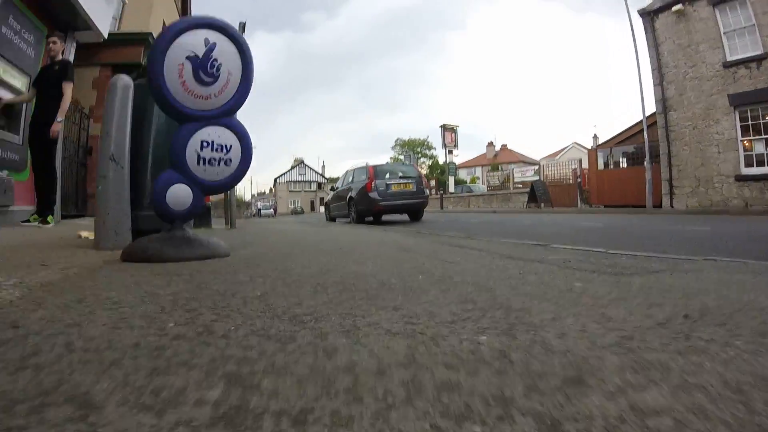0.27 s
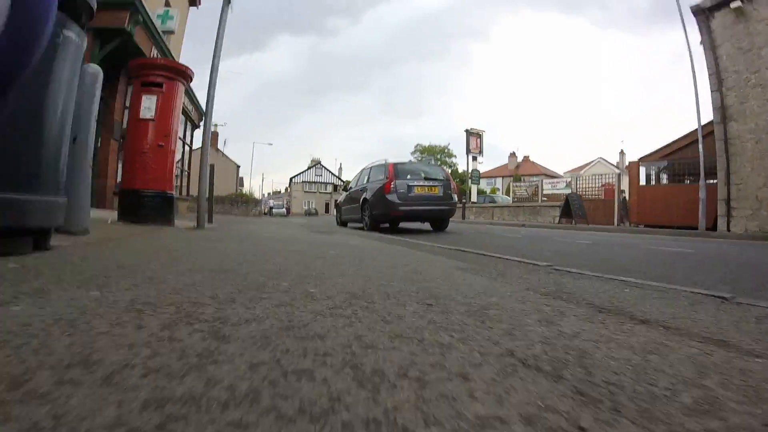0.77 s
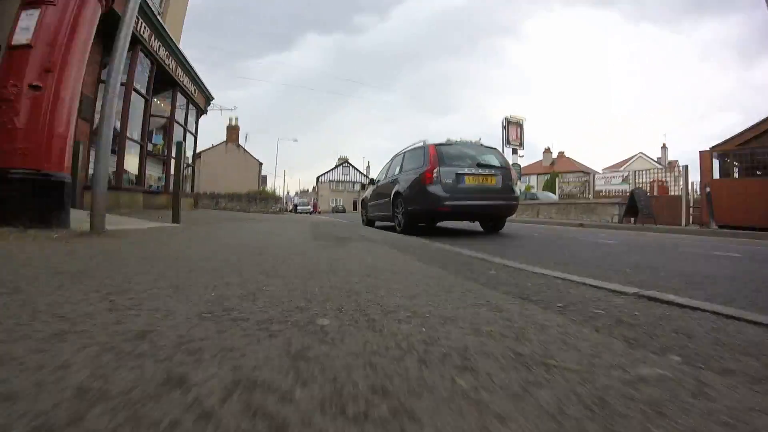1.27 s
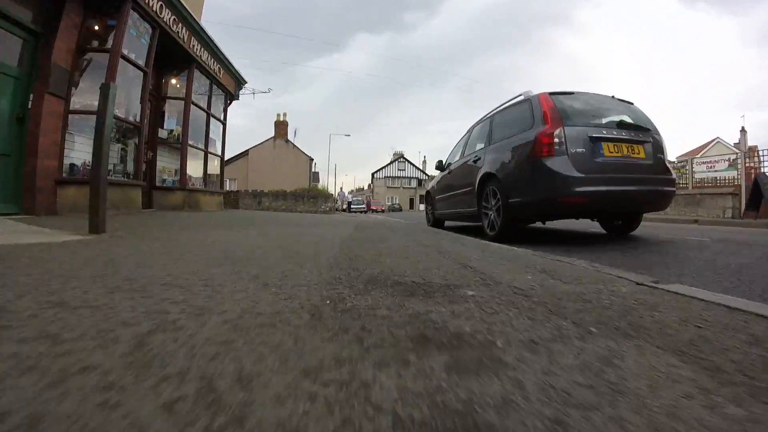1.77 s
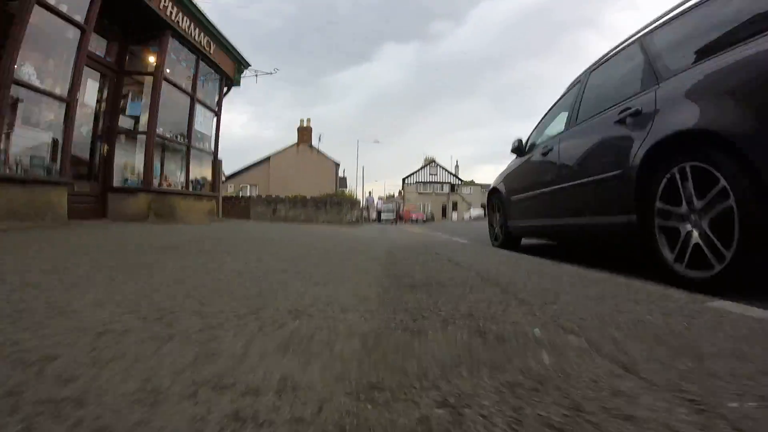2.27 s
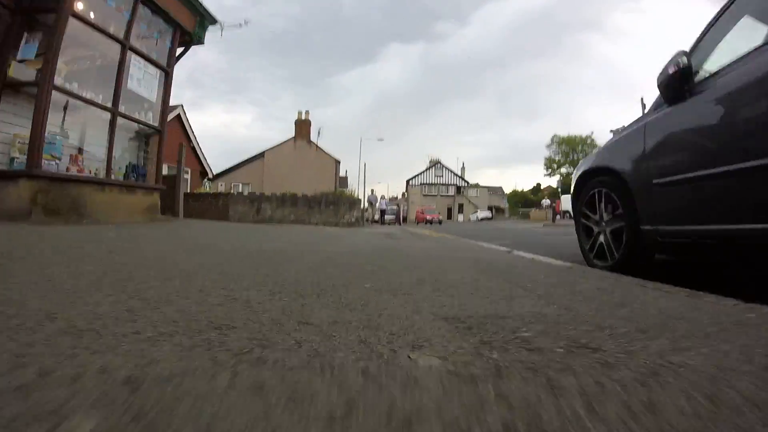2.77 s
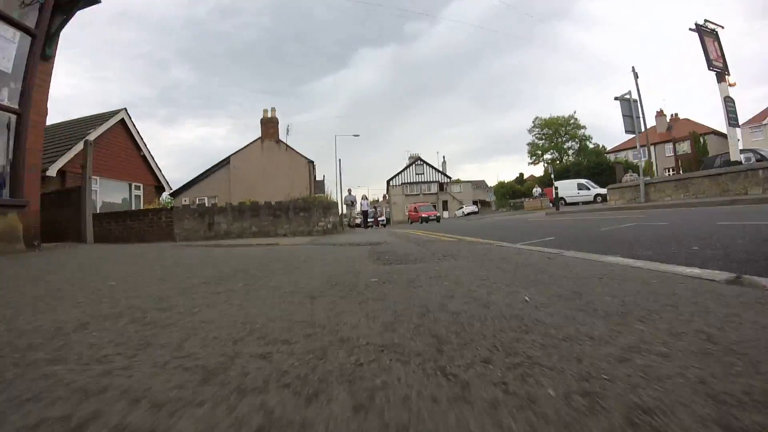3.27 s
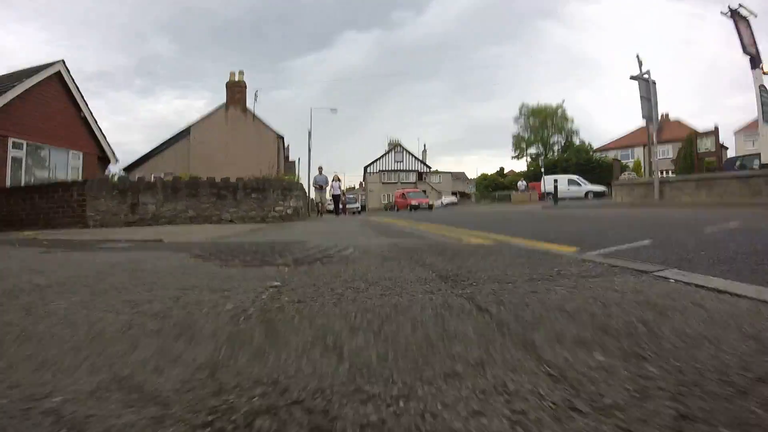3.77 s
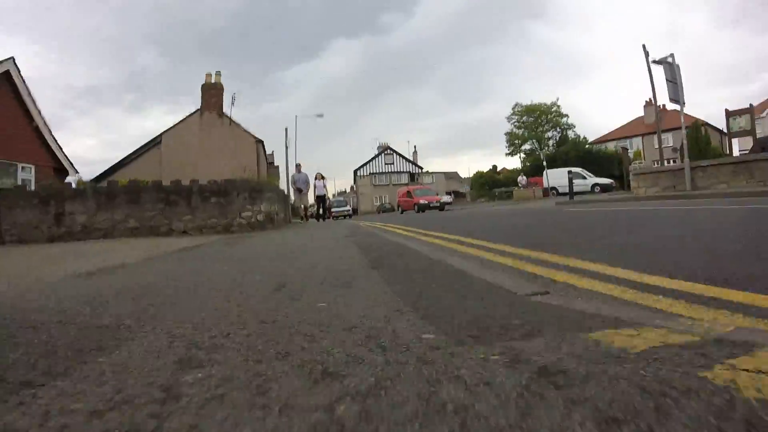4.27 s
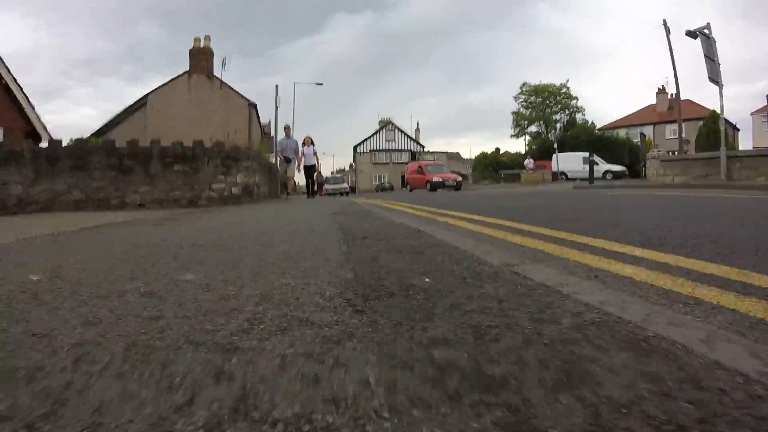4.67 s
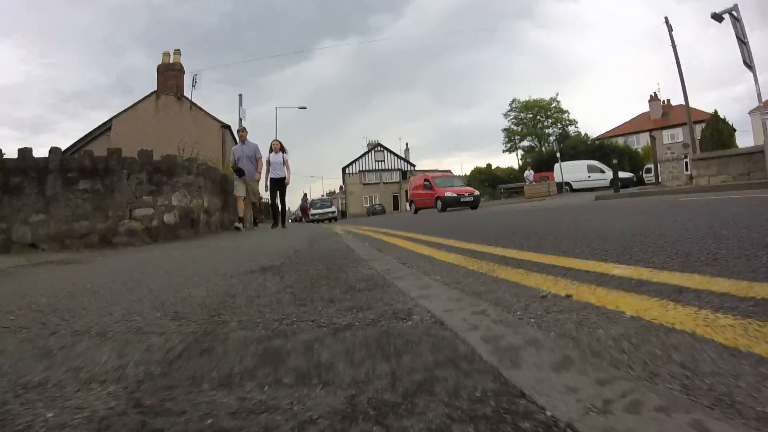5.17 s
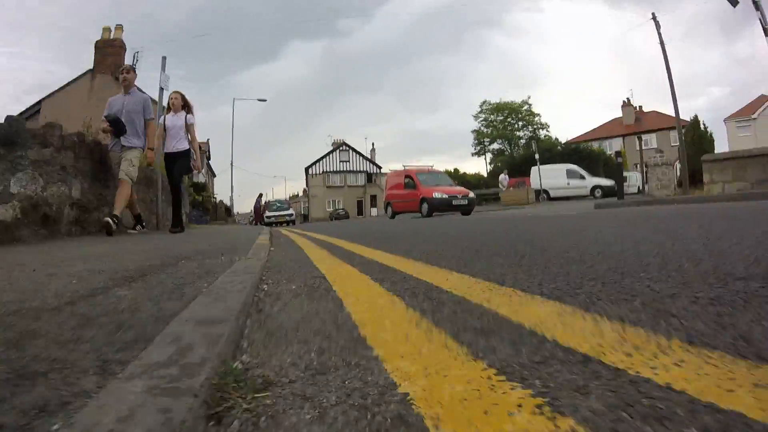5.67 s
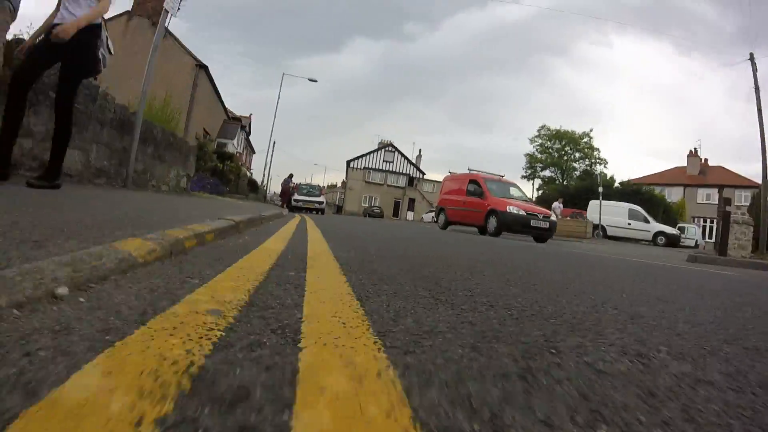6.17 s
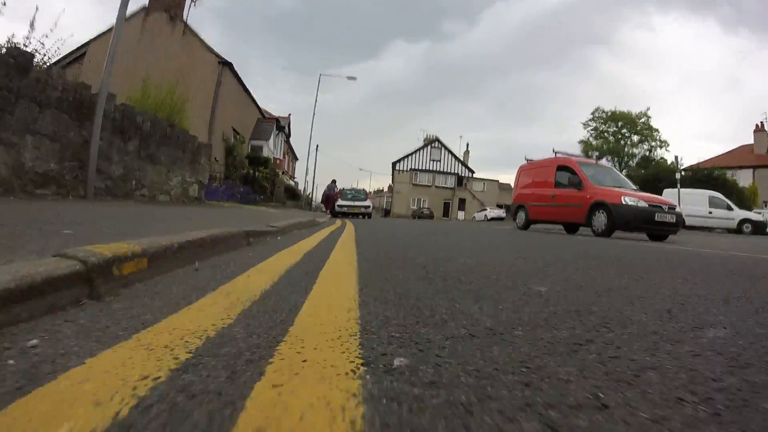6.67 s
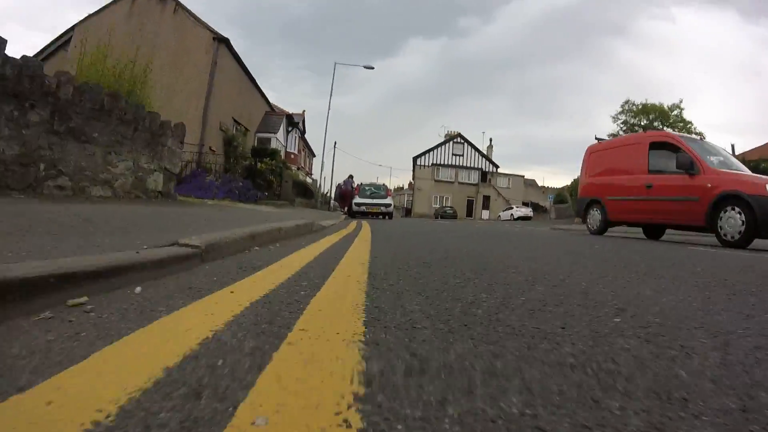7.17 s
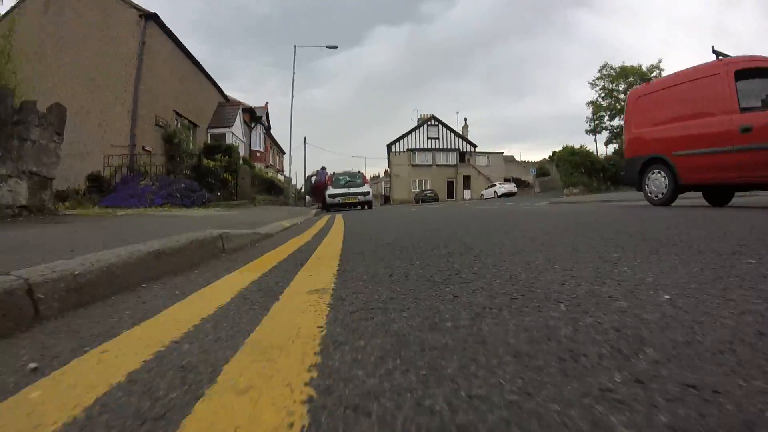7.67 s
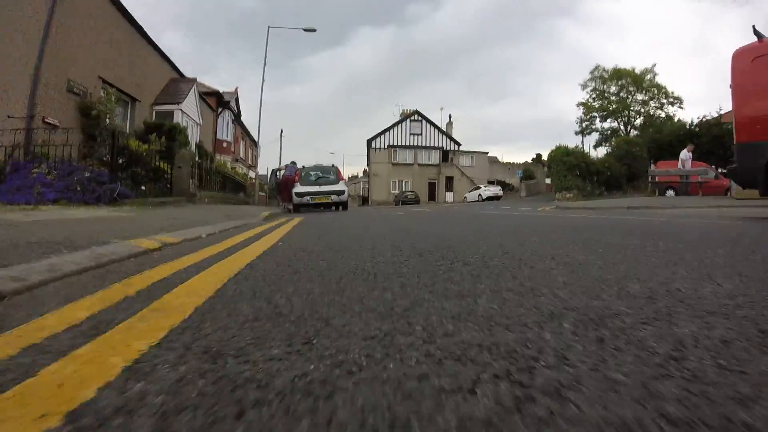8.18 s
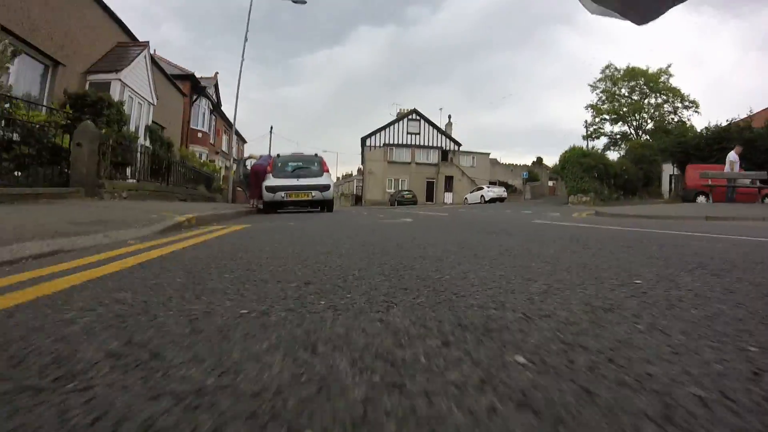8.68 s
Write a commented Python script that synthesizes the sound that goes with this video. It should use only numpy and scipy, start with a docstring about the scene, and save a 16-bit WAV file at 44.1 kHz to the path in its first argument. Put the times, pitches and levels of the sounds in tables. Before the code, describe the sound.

Continuous low booming roll of skateboard wheels on coarse road, heard through the deck, with rattles, gritty hiss, sharp clacks and tiny chirps.

```python
"""A booming, growling roll with loose chatter and hard knocks: a longboard on rough asphalt,
heard by a camera fixed to the deck. Road bumps make the deck boom on its bending mode, grit makes the wheels
growl, and the camera mount chatters as the deck swings. Cracks and kerb edges knock through, slips chirp,
scrubbing wheels swish and fine grit hisses. A soft limiter holds the peaks down."""
import sys
import numpy as np
from scipy import signal
from scipy.fft import rfft, irfft, next_fast_len
from scipy.io import wavfile
from scipy.ndimage import uniform_filter1d

SR = 44100
rng = np.random.default_rng(int(sys.argv[2]) if len(sys.argv) > 2 else 0)


def pcm_store(signal):
    """Save signal as 16-bit PCM."""
    levels = np.round(np.clip(np.atleast_2d(signal), -1, 1) * 32767)
    wavfile.write(sys.argv[1], SR, levels.astype(np.int16).T)


N = 393372  # samples

# modes of wheels and trucks: (frequency [Hz], width [Hz], level [dB])
WHEEL_MODES = [(198.8, 81.4, 3.5), (321.5, 71, -1), (405, 92.6, -1.5), (573, 151, -18.5)]
# modes of the camera mount: (frequency [Hz], width [Hz], level [dB])
MOUNT_MODES = [(840, 730, 0.5), (1270, 95, 3.5), (1447, 390, 1), (1898, 236, 5.5), (2500, 388, 2),
               (3400, 1000, -18.5)]
# modes of the mount's casing: (frequency [Hz], width [Hz], level [dB])
CASING_MODES = [(3940, 470, -0.5), (5784, 1260, -1.5), (7560, 700, -9), (8300, 1170, -8),
                (9940, 3100, -19.5), (13000, 2600, -31.5)]
USUAL_GROWL_DB, USUAL_CHATTER_DB = -32, -48  # reference levels for layers that follow the road


def amp(db):
    """Decibels to amplitude."""
    return 10 ** (np.asarray(db) / 20)


def evened(x):
    """Scales a signal to rms 1."""
    return x / np.sqrt(np.mean(x ** 2) + 1e-20)


def peak_one(x):
    """Scales a signal to peak 1."""
    return x / abs(x).max()


def curves(rows):
    """Draws each column of a timed table as a curve, one value a sample."""
    times, *columns = np.transpose(rows)
    return [np.interp(np.arange(N) / SR, times, column) for column in columns]


def wander(smooth_s):
    """Slow random drift of rms 1: noise averaged twice."""
    size = max(round(smooth_s * SR), 1)
    smoothed = uniform_filter1d(rng.standard_normal(N), size)
    return evened(uniform_filter1d(smoothed, size))


def grit(per_s, spread_db):
    """Random stone contacts at a mean rate, a few of them large."""
    boost_db = spread_db * np.minimum(rng.exponential(1, N), 5)
    size = amp(boost_db) * rng.standard_normal(N)
    return size * (rng.random(N) < per_s / SR)


def resonate(x, hz, width):
    """Shifts hz down to zero, smooths twice, shifts back: a steep resonance of gain 1."""
    turn = np.exp(2j * np.pi * np.cumsum(hz * np.ones(len(x))) / SR)
    r = np.exp(-np.pi * width / SR)
    smoothed = signal.lfilter([(1 - r) ** 2], [1, -2 * r, r * r], x / turn)
    return 2 * (turn * smoothed).real


def rings(modes):
    """Impulse responses of damped modes, one row each; alternating signs keep holes from forming between them."""
    t = np.arange(2048) / SR
    rows = []
    for k, (hz, width, db) in enumerate(modes):
        envelope = width * width * t * np.exp(-np.pi * 1.5 * width * t)
        rows.append((-1) ** k * amp(db) * envelope * np.cos(2 * np.pi * hz * t))
    return np.array(rows)


def body(modes):
    """All modes sounding together, scaled to energy 1."""
    ring = rings(modes).sum(0)
    return ring / np.linalg.norm(ring)


def strike(burst, modes):
    """A burst of contacts rings every mode with the energy its table gives it; the sum peaks at 1."""
    ring = rings(modes)
    rung = signal.oaconvolve(burst[None], ring, axes=1)
    balance = np.linalg.norm(ring, axis=1) / np.linalg.norm(rung, axis=1)
    return peak_one(balance @ rung)


def deck():
    """Road bumps shake the deck's bending mode; damping grows with swing, so the boom stays fairly even."""
    # how the rider loads the deck: (time [s], level [dB])
    load_table = [(0.0, -12.5), (0.07, -9), (0.17, -20), (0.3, -12), (0.56, -11), (0.95, -10), (1.25, -11),
                  (1.45, -9), (2.05, -11.5), (2.9, -11), (3.45, -12), (3.85, -12.5), (4.18, -14),
                  (4.45, -12.5), (4.75, -12), (5.5, -10.5), (5.9, -9.5), (6.15, -13.5), (7.0, -11),
                  (7.7, -10.5), (8.15, -10), (8.45, -15.5), (8.65, -12.5), (8.92, -13)]
    # bending pitch as the rider shifts weight: (time [s], frequency [Hz])
    bending_table = [(0, 91.1), (0.25, 99.4), (0.5, 93.83), (0.82, 116.9), (1.1, 92.56), (1.25, 81.06),
                     (1.45, 107.7), (1.75, 103.5), (2.0, 119.3), (2.15, 106.6), (2.3, 114.8), (2.5, 103),
                     (2.9, 109.3), (3.03, 97), (3.2, 108.6), (3.5, 114), (3.65, 100), (3.8, 123.1),
                     (3.95, 90), (4.1, 86), (4.38, 91.16), (4.55, 116), (4.7, 91.8), (4.85, 109.7),
                     (5.0, 103), (5.15, 116.5), (5.3, 109), (5.45, 124.8), (5.72, 97.9), (5.88, 114.1),
                     (5.98, 92), (6.08, 111.7), (6.2, 99), (6.5, 110), (7.05, 116.8), (7.25, 111.1),
                     (7.42, 124), (7.6, 104), (7.85, 113.4), (7.95, 100.6), (8.15, 127), (8.38, 94.3),
                     (8.68, 122), (8.92, 105.4)]
    # spectrum of the long road bumps: (frequency [Hz], level [dB per Hz])
    bump_spectrum = [(20, -22), (45, -33.5), (70, -2.5), (120, -4.5), (180, 1.5), (260, -17)]
    pitch_drift, drift_s = 0.02507, 0.0493  # rms drift as a share of the pitch; smoothing [s]
    deck_width_hz = 39

    (level_db,), (hz,) = curves(load_table), curves(bending_table)
    hz = hz * (1 + pitch_drift * wander(drift_s))
    bump_hz, bump_db = np.transpose(bump_spectrum)
    log_hz = np.log(np.fft.rfftfreq(N, 1 / SR) + 1)
    shape = amp(np.interp(log_hz, np.log(bump_hz), bump_db))
    bumps = irfft(rfft(rng.standard_normal(N)) * shape, N)
    swing = evened(resonate(bumps, hz, deck_width_hz))
    # the mode never dies out between bumps: part of the swing carries on steadily
    steady_hz = hz * (1 + 0.04504 * wander(0.01355))
    swing = swing + 0.87 * np.sin(2 * np.pi * np.cumsum(steady_hz) / SR)
    # the damping acts as a leveller that follows the local swing
    slow = np.sqrt(uniform_filter1d(swing ** 2, size=round(0.048 * SR)) + 0.046)
    return amp(level_db) * evened(swing / slow ** 0.92 * amp(-lulls()))


def lulls():
    """Loss of swing in dB: it deepens slowly towards each restart by a jolt, then clears fast."""
    # lulls of the swing; a negative depth lifts it: (time of the restart [s], depth [dB])
    lull_table = [(0.082, 7), (0.199, 3), (0.701, 13), (0.914, 7), (0.999, 12.5), (1.104, 3), (1.21, 6.5),
                  (1.316, -1), (1.492, 11.5), (1.749, 7), (2.069, 9), (2.747, 5.5), (3.202, 12),
                  (3.831, 8.5), (4.0, 11.5), (4.214, 12.5), (4.332, 16.5), (4.42, -0.5), (4.561, 10),
                  (4.756, 14.5), (4.994, 3.5), (5.074, 8.5), (5.301, 8.5), (5.69, -3), (5.931, 8.5),
                  (6.045, 7), (6.1, 6.5), (5.74, 5.5), (6.205, 15.5), (6.318, 0.5), (6.518, 14),
                  (6.709, 11.5), (6.817, 9.5), (7.101, 6), (7.244, 9.5), (7.325, 6), (7.36, 3.5),
                  (7.482, 8.5), (7.542, 6.5), (7.645, 6), (7.72, 8), (7.98, 11), (8.257, 15), (8.41, 9.5)]
    lull_s, restart_s = 0.029, 0.0044  # spans of deepening and clearing
    small_per_s, small_db = 3, 2.5  # mean rate and median depth of the random shallow ones

    moments = np.cumsum(rng.exponential(1, 120)) / small_per_s
    moments = moments[moments < (N - 1) / SR]
    small = [(s, small_db * np.exp(0.32 * rng.standard_normal())) for s in moments]
    times, depth_db = np.transpose(lull_table + small)
    marks = np.bincount(np.round(times * SR).astype(int), depth_db, N)[:N]
    t = np.arange(-4000, 4001) / SR
    dip = np.where(t < 0, np.exp(-(t / lull_s) ** 2), np.exp(-(t / restart_s) ** 2))
    return signal.oaconvolve(marks, dip, "same")


def wheels(level_db):
    """Grit drums the wheel and truck modes, each swelling on its own; coarse road favours two truck modes."""
    truck_per_growl = 0.097  # dB of favour per dB of growl
    drive = grit(9000, 1.75) * amp(2.2 * np.tanh(wander(0.037)))
    favour_db = truck_per_growl * (level_db - USUAL_GROWL_DB)
    modes = [amp(2.0 * wander(0.042)) * signal.oaconvolve(drive, ring)[:N] for ring in rings(WHEEL_MODES)]
    trucks = amp(favour_db) * (modes[1] + modes[2])
    # the divisor offsets the loudness that the favour adds
    growl = (modes[0] + modes[3] + trucks) / np.sqrt(.5 + .5 * amp(2 * favour_db))
    return amp(level_db) * evened(growl)


def mount(swing, chatter_db, fizz_db):
    """Wide swings make the mount chatter, most at both ends of a swing; its casing ticks in mid swing."""
    whole = signal.hilbert(swing, next_fast_len(N))[:N]
    size, phase = evened(abs(whole)), np.angle(whole)
    size = size / np.sqrt(uniform_filter1d(size ** 2, size=round(.12 * SR)))
    lumps = amp(1.0 * wander(0.025))
    contacts = grit(9000, 2.5)
    play = contacts * (size + 0.35) ** 1.73 * lumps * amp(5.4 * np.cos(2 * phase + 0.3))
    # the contact point roams, so each mode comes and goes on its own
    modes = [amp(1.2 * wander(0.11)) * signal.oaconvolve(play, ring)[:N] for ring in rings(MOUNT_MODES)]
    chatter = evened(sum(modes))

    beat = amp(5.1 * np.cos(2 * phase - 2.1) + 1.1 * np.cos(phase - .7))
    dust = evened(grit(14000, 1.5))
    flutter = amp(6.1 * np.tanh(wander(0.0011)))
    ticks = (0.7 * evened(contacts) + dust) * (size + 0.077) ** 0.5 * lumps * beat * flutter
    fizz = evened(signal.oaconvolve(ticks, body(CASING_MODES))[:N])
    return amp(chatter_db) * chatter + amp(fizz_db) * fizz


def knocks():
    """Cracks, stones and edges: a burst of contacts in mount and casing, one push on wheels and board."""
    # the clearest knocks: (time [s], clack peak [dB], low mode tilt [dB], high mode tilt [dB],
    # casing tick against clack [dB], thump peak [dB], heave peak [dB], clack length [s])
    knock_table = [(0.039, -15, 10, 7, -30, -14, -23, 0.0044),
                   (0.046, -17.5, 3, 8, -16, -10.5, -25, 0.0071),
                   (0.0723, -16, -5, -1, -11, -11, -25, 0.0013),
                   (0.0764, -14, 8, 6, -12, -24, -5.5, 0.0017), (0.185, -29, -8, -2, -26, -25, -22, 0.0027),
                   (0.205, -17.5, -8, -0.5, -10, -11, -7, 0.0041),
                   (0.312, -31, -2, -10, -1, -10.5, -22, 0.0031),
                   (0.919, -25, -8, -4, -9, -32, -26, 0.0031), (1.3184, -29, -7, -12, -10, -12, -31, 0.014),
                   (1.667, -30, 4, 9, -2, -8.5, -31, 0.0034), (2.208, -24, 16.5, 15, -27, -25, -33, 0.0046),
                   (2.306, -24, 9, 11.5, -28, -13, -18, 0.0041),
                   (2.694, -20, 11, 13, -30, -17, -11, 0.0017), (2.756, -23.5, 6, 5, -31, -40, -34, 0.0031),
                   (2.8475, -20.5, 8, 6, -14, -8, -39, 0.0039), (2.864, -22, 9, 6, -22, -14, -34, 0.0024),
                   (3.048, -22, 7, 9, -17, -10, -37, 0.0033), (3.076, -27, 6, 7, -15, -9, -30, 0.0066),
                   (3.893, -21.5, 7.5, -1, -20, -10, -2, 0.0044),
                   (3.947, -22, 5, 7, -19, -19.5, -17, 0.0065),
                   (4.095, -24.5, -10, -9, -18, -12, -12, 0.0041),
                   (4.22, -34, 0, -4, -20, -25, -24, 0.0025), (4.228, -28, -6, 1, -7, -16, -7, 0.003),
                   (4.2376, -6, 0.5, 7, -11.5, -4.5, -31, 0.00092),
                   (4.294, -24, 8, 0, -12, -19, -10, 0.0024), (4.433, -26.5, 6.5, 4, -13, -14, -14, 0.0076),
                   (4.528, -28.5, 2, 3, -11, -19, -10, 0.0067),
                   (4.7, -17.5, 7.5, 11.5, -17, -12.5, -9, 0.0048),
                   (4.996, -36, 2, 6, -18, -41, -33, 0.0036), (5.09, -27, 8, 6, -12, -13, -33, 0.011),
                   (5.595, -23.5, 13, 17, -31, -30, -26, 0.0033),
                   (5.656, -25, 3, 1, -10, -13, -7.5, 0.0068),
                   (5.6945, -8.5, -3, 10.5, -16, -6.5, -17, 0.0017),
                   (5.9342, -9.5, 13, 9, -13.5, -9.5, -27, 0.0017),
                   (5.9413, -24, 9, 10, -16, -15, -32, 0.002), (5.96, -20, 9, 9, -20, -28, -47, 0.0013),
                   (5.987, -21, 8, 13, -12, -14.5, -40, 0.0018),
                   (5.994, -30.5, 7, 0, -25, -23, -39, 0.0029), (6.003, -31, 2, 6, -21, -32, -34, 0.0019),
                   (6.047, -29.5, 2, 5, -14, -21, -35, 0.0044), (6.065, -34, 1, 3, -16, -17.5, -34, 0.0045),
                   (6.104, -35, 3, 3, -14, -20, -25, 0.0061),
                   (6.2015, -18.5, -4, -3, -14, -35, -30, 0.0033),
                   (6.209, -27.5, 6, 5, -24, -27, -19, 0.0069), (6.753, -28.5, -1, 8, -9, -23, -27, 0.0042),
                   (7.255, -28, -1, 0, -11, -15, -32, 0.0052), (8.0176, -27, -7, -7, -6, -9, -42, 0.0043),
                   (8.629, -26, 1, 2, -16, -7.5, -39, 0.01), (0.061, -36, -2, 0, -23, -19, -3, 0.0043),
                   (0.068, -40, -2, 0, -20, -11, -30, 0.0017), (0.118, -31, -5, 3, -7, -23, -24, 0.0026),
                   (5.249, -26, 3, 3, -20, -29, -39, 0.0068), (5.699, -23, -4, -2, -13, -13, -10, 0.0029),
                   (6.3677, -35, -1, 1, -18, -12, -11.5, 0.002), (6.2036, -38, 4, 6, -17, -5, -8, 0.002),
                   (8.439, -40, 0, 0, -20, -12, -12, 0.003), (0.813, -26.5, 0, -3, -11, -26, -32, 0.0068),
                   (1.0201, -27, -5, -1, -9, -25, -32, 0.004), (1.262, -34, 3, -15, -16, -23, -36, 0.0063),
                   (1.49, -33, -1, -7, -16, -32, -30, 0.0057), (1.7559, -26, -4, -8, -9, -19, -26, 0.0054),
                   (1.941, -28.5, 16, -4, -5, -33, -38, 0.0048),
                   (2.0836, -34, 4, -2, -16, -24, -33, 0.0058), (2.1888, -35, 5, -5, -18, -30, -19, 0.005),
                   (2.2378, -24, 8, 6, -24, -21, -31, 0.0041), (2.556, -30, 9, 7, -18, -21, -34, 0.0065),
                   (2.627, -31.5, -2, -2, -8, -14, -34, 0.0056), (3.2207, -30, 7, 6, -19, -31, -36, 0.0054),
                   (3.4645, -35, 1, -8, -9, -26, -34, 0.0068), (3.8193, -41, 3, 11, -23, -20, -22, 0.0056),
                   (3.869, -25, 3, -2, -23, -34, -34, 0.0084), (3.914, -28.5, 8, 4, -27, -26, -34, 0.0057),
                   (4.2421, -28, -2, 3, -18, -34, -15, 0.0051), (4.7636, -34, -8, 9, -10, -20, -33, 0.0047),
                   (4.812, -41, 1, -1, -14, -25, -32, 0.0054), (4.8462, -31.5, -9, 5, -6, -33, -34, 0.0047),
                   (5.708, -28, 3, 1, -21, -28, -31, 0.0061), (6.5336, -33, 2, 6, -1, -14, -36, 0.0063),
                   (6.6797, -33, 1, 4, -18, -30, -32, 0.0064), (6.8269, -31.5, 5, 5, -16, -25, -28, 0.0043),
                   (6.838, -39, 4, -1, -19, -24, -33, 0.005), (6.953, -41, 3, 1, -12, -17, -36, 0.005),
                   (6.9883, -35, 7, 4, -11, -26, -33, 0.0057),
                   (7.0618, -29.5, 8.5, 3, -12, -37, -33, 0.0048),
                   (7.1121, -41, 1, 3, -17, -24, -38, 0.005), (7.1361, -29.5, 7, 7, -13, -22, -34, 0.0063),
                   (7.1747, -33, 4, 3, -15, -31, -37, 0.0048), (7.329, -34, -4, 1, -16, -16, -32, 0.005),
                   (7.3657, -37, 0, 3, -15, -18, -32, 0.0043), (7.423, -30, 2, -1, -7, -29, -30, 0.005),
                   (7.483, -29, 4, 3, -17, -32, -25, 0.0054), (7.8314, -32.5, -2, 3, -4, -21, -33, 0.0048),
                   (8.1105, -31, 2, 2, -22, -25, -24, 0.0061), (8.21, -31, 7, 10, -20, -27, -37, 0.0053),
                   (8.3606, -38, 1, 1, -18, -27, -34, 0.0056), (8.4317, -30, 3, -4, -16, -28, -37, 0.0051),
                   (8.4861, -33, 3, -3, -16, -22, -32, 0.006), (8.518, -41, 3, -3, -18, -24, -34, 0.0042),
                   (8.7933, -33, 1, 2, -20, -31, -37, 0.0053)]
    # the whole board bouncing on its wheels: (frequency [Hz], width [Hz], level [dB])
    heave_modes = [(57.4, 31, -2.5), (134, 76, -5)]
    clack_rise, first_contact = .25, 4.1  # share of the clack length; added height over noise of rms 1
    # thump and heave swell slowly, so they start early to land together with the clack
    thump_lead_s, heave_lead_s = 0.00395, 0.0038
    struck_width_hz = 140  # a hard blow damps the mount, so its modes ring wider than in the chatter

    t = np.arange(1500) / SR
    noise = rng.standard_normal((len(knock_table), len(t)))
    push = peak_one(signal.oaconvolve(np.exp(-t / 0.00041), body(WHEEL_MODES)))
    heave = peak_one(signal.oaconvolve(np.exp(-t / 0.0018), body(heave_modes)))
    out = np.zeros(N + 4000)
    for row, burst in zip(knock_table, noise):
        s, db, low_db, high_db, bright_db, thump_db, heave_db, length = row
        rise = 1 - np.exp(-t / max(clack_rise * length, 1e-5))
        burst = burst * np.exp(-t / max(length, 1e-4)) * rise
        burst[round(clack_rise * length * SR)] += first_contact  # the first contact is the hardest
        tilts = (0, low_db, low_db / 2, 0, high_db, 1.2 * high_db)
        struck = [(hz, np.hypot(width, struck_width_hz), mode_db + tilt)
                  for (hz, width, mode_db), tilt in zip(MOUNT_MODES, tilts)]
        clack = strike(burst, struck)
        tick = strike(burst, CASING_MODES)
        parts = ((s, amp(db) * (clack + amp(bright_db) * tick)),
                 (s - thump_lead_s, -amp(thump_db) * push),
                 (s - heave_lead_s, -amp(heave_db) * heave))
        for at, sound in parts:
            out[max(round(at * SR), 0):][:len(sound)] += sound
    return out[:N]


def chirps():
    """Each brief slip in the mount rings one narrow, slightly unsteady mode."""
    # slips that chirp near one of the mount's high modes: (time [s], peak [dB], pitch [Hz])
    chirp_table = [(0.39, -32.5, 2500), (0.4132, -44, 2570), (0.4457, -35, 2580), (0.4721, -34, 2360),
                   (0.5092, -40, 2630), (0.5575, -39, 2300), (0.6416, -36, 2780), (0.6663, -38, 2620),
                   (0.6818, -39, 2620), (0.7057, -30.5, 2580), (0.8565, -33, 2390), (0.878, -37, 2747),
                   (0.891, -34, 2530), (1.424, -29, 2660), (1.442, -30.5, 2780), (1.65, -35, 2760),
                   (3.739, -44, 2613), (3.7718, -31, 2611), (4.8296, -48, 2360), (5.8171, -30, 2590),
                   (5.8325, -27, 2548), (5.8571, -31, 2550), (6.1401, -38, 2797), (6.2321, -36, 2660),
                   (6.2694, -39, 2817), (6.2896, -33, 2676), (6.32, -35, 2713), (6.3391, -35, 2497),
                   (6.3582, -34, 2780), (6.38, -36, 2570), (6.4158, -49, 2756), (7.6332, -38, 2790),
                   (7.9074, -30, 2511), (7.9378, -40, 2671)]
    chirp_s, chirp_width_hz = 0.0019, 220  # time to the envelope's peak; width of the mode
    chirp_glide = -0.0097  # the pitch sags by this share every chirp_s

    t = np.arange(1500) / SR
    u = t / chirp_s
    out = np.zeros(N + len(t))
    for (s, db, hz), slip in zip(chirp_table, rng.standard_normal((len(chirp_table), len(t)))):
        chirp = resonate(slip, hz * (1 + chirp_glide * (u - 1)), chirp_width_hz)
        # level the ring before shaping it
        chirp = chirp / np.sqrt(uniform_filter1d(chirp ** 2, size=60) + .1 * np.mean(chirp ** 2))
        out[round(s * SR):][:len(t)] += amp(db) * peak_one(chirp * u * np.exp(-u))
    return out[:N]


def swishes():
    """A wheel scrubs sideways for a moment: soft noise in one high band."""
    # sideways scrubs: (start [s], length [s], level before the fades [dB], band [Hz])
    swish_table = [(0.631, 0.074, -54, 2700), (0.842, 0.073, -50, 2680), (3.72, 0.085, -52, 2650),
                   (5.779, 0.1, -48, 2714), (6.22, 0.19, -49.5, 2700), (7.62, 0.057, -47.5, 2781),
                   (7.823, 0.061, -50, 2647), (7.899, 0.12, -46.5, 2700)]
    swish_width_hz = 560
    out = np.zeros(N)
    for s, length, db, hz in swish_table:
        t = np.arange(0, length, 1 / SR)
        scrub = evened(resonate(rng.standard_normal(len(t)), hz, swish_width_hz))
        fades = np.sqrt(np.sin(np.pi * t / length))
        out[round(s * SR):][:len(t)] += amp(db) * fades * scrub
    return out


def hiss(chatter_db):
    """Fine grit under the wheels keeps the mount's modes singing, also while the deck rests."""
    # modes that sing: (frequency [Hz], width [Hz], level [dB])
    hiss_modes = [(1150, 540, -11), (1810, 300, 2.5), (2550, 370, -5.5), (3400, 780, -21)]
    hiss_db, hiss_per_chatter = -54.5, 1  # level at the usual chatter; dB per dB of chatter
    sung = signal.oaconvolve(grit(8000, 1.4), body(hiss_modes))[:N]
    return amp(hiss_db + hiss_per_chatter * (chatter_db - USUAL_CHATTER_DB)) * evened(sung)


def scene():
    """The road's coarseness sets growl, chatter, fizz and hiss; all layers add up."""
    # coarseness of the surface: (time [s], wheel growl [dB], mount chatter [dB])
    road_table = [(0.0, -36, -38), (0.035, -33.5, -68), (0.1, -29.5, -50), (0.16, -43, -54.5),
                  (0.28, -26.5, -43.5), (0.47, -35, -45), (0.78, -23.5, -47), (1.14, -30.5, -46.5),
                  (1.3, -20, -42), (1.7, -25, -42), (1.88, -25, -43.5), (1.97, -17.5, -40.5),
                  (2.06, -24, -43), (3.28, -28, -45), (3.52, -20, -41.5), (3.74, -29.5, -44),
                  (3.87, -20, -42.5), (3.97, -36, -48), (4.09, -19, -45.5), (4.2, -31.5, -49.5),
                  (4.5, -36, -49.5), (4.67, -21.5, -44.5), (4.78, -33, -47), (5.0, -29, -46.5),
                  (5.3, -29, -45), (5.52, -24.5, -41.5), (5.66, -36, -50), (5.8, -28, -40.5),
                  (6.06, -34.5, -51.5), (6.3, -29.5, -47), (6.5, -27, -45), (7.15, -34.5, -48.5),
                  (7.47, -25, -44.5), (7.78, -31.5, -46), (8.02, -19, -42), (8.13, -27, -44.5),
                  (8.31, -28, -45), (8.43, -21, -45.5), (8.53, -11.5, -36.5), (8.65, -27.5, -45.5),
                  (8.8, -25.5, -45.5), (8.92, -13.5, -42.5)]
    growl_db, chatter_db = curves(road_table)
    # the casing fizz follows growl and chatter, in dB per dB
    fizz_db = -56.5 + 0.26 * (growl_db - USUAL_GROWL_DB) + 0.49 * (chatter_db - USUAL_CHATTER_DB)
    swing = deck()
    rolling = swing + wheels(growl_db) + mount(swing, chatter_db, fizz_db) + hiss(chatter_db)
    return (rolling + knocks() + chirps() + swishes())[None]


def record(dry):
    """The microphone's bass roll-off, soft limiting of the peaks, then the band limit."""
    edge_hz = 15800
    bass_cut = signal.butter(2, 24., "high", fs=SR, output="sos")
    held = 1.203 * np.tanh(signal.sosfilt(bass_cut, dry) / 1.32)
    band_limit = signal.firwin(511, edge_hz, window=("kaiser", 9), fs=SR)
    return signal.oaconvolve(held, band_limit[None], "same")


dry = scene()
out = record(dry)
pcm_store(out)
```